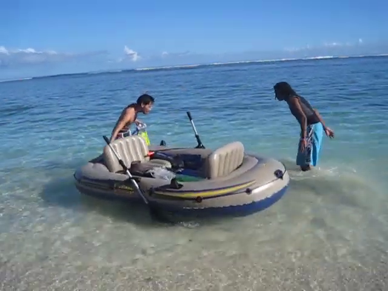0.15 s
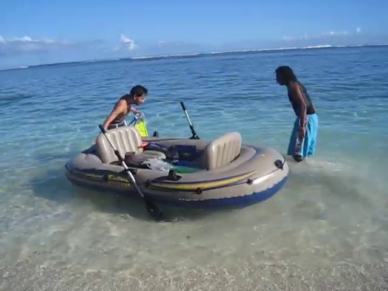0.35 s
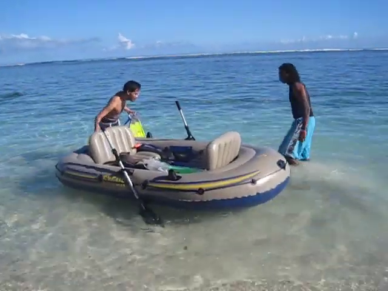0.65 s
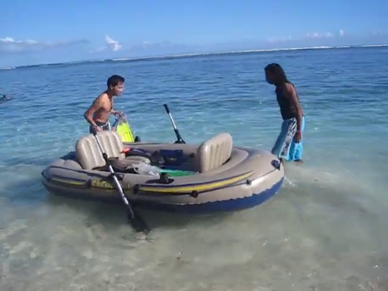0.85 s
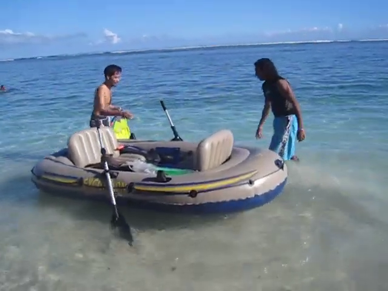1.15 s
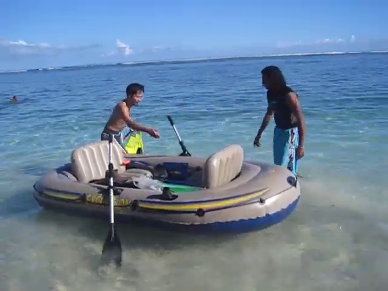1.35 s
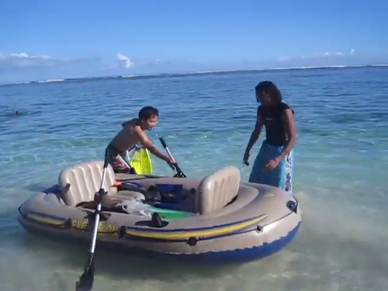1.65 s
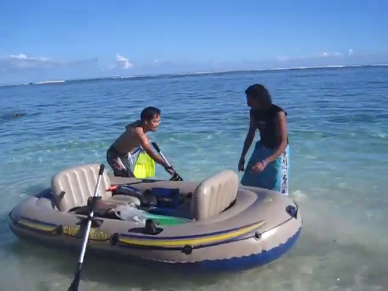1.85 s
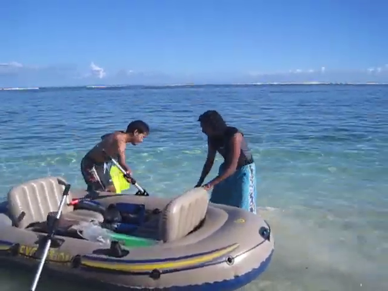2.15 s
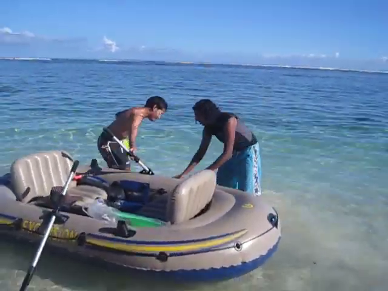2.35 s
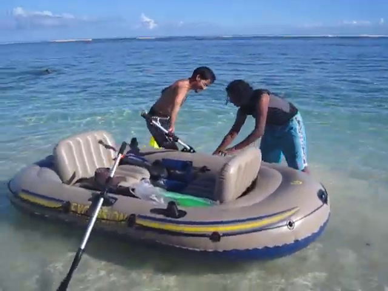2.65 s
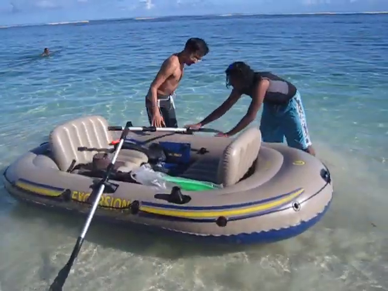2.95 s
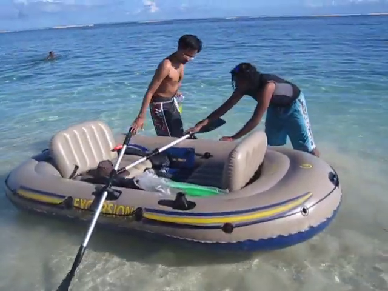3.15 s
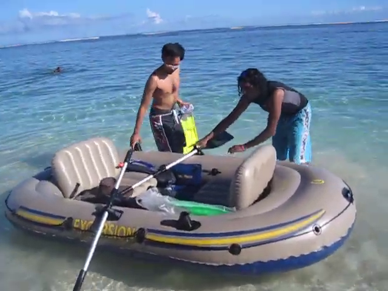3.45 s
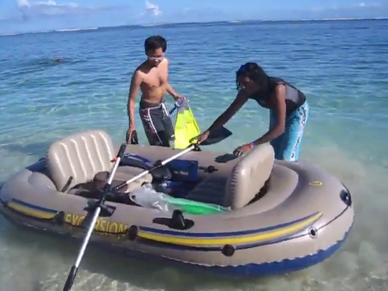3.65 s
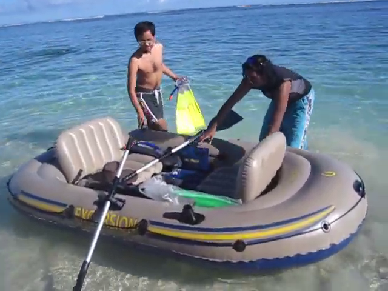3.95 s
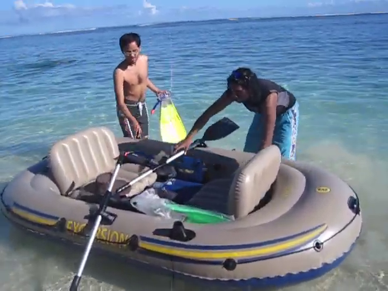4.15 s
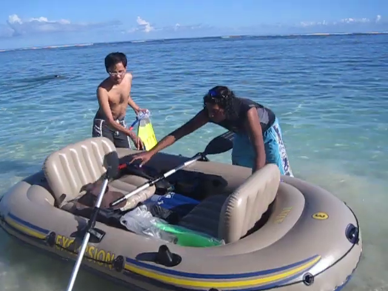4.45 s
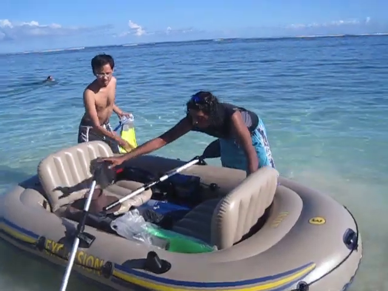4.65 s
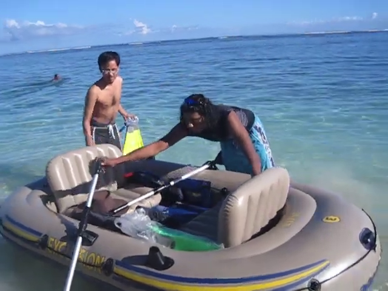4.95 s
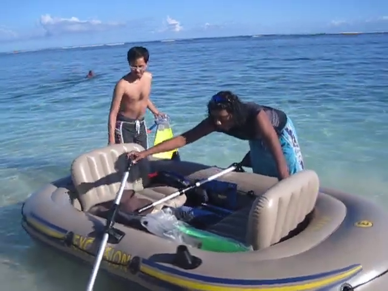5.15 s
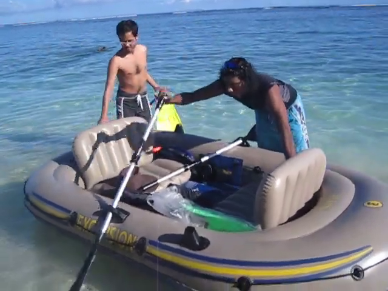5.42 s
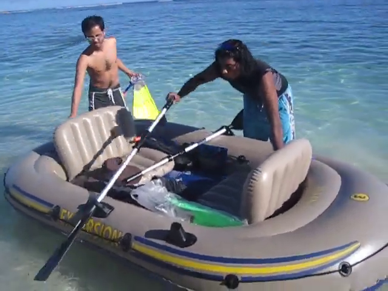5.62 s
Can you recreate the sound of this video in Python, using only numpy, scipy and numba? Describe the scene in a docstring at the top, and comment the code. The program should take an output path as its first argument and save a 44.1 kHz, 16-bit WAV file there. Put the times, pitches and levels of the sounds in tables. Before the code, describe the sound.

Soft shore wash swells and fades, then sharp hard-plastic clacks, ticks and brief rubs crowd close over a faint breeze rumble.

```python
"""Shore wash through a sealed housing

Small waves fizz over shallow sand: noise and bubble grains through the resonances of a plastic camera housing.
Fingers tap, tick and slide on it: rough pushes and stick-slip clicks.
A chirp, a rattle and finger squeaks are narrow noise; drops ring the air pocket inside.
A light breeze, shaped noise, rumbles on the port; the gain control backs off after the loudest knocks.
"""
import sys
import numpy as np
from scipy import signal
from scipy.fft import rfft, irfft, next_fast_len
from scipy.io import wavfile
from scipy.ndimage import uniform_filter1d
from numba import njit

SR = 44100
rng = np.random.default_rng(int(sys.argv[2]) if len(sys.argv) > 2 else 0)


def to_wav(sig):
    """Store sig (one row per channel, or 1-D mono) as 16-bit WAV at the path in sys.argv[1].

    Samples outside -1..1 are clipped; the rate is SR.
    """
    pcm = np.clip(np.atleast_2d(sig), -1, 1) * 32767
    pcm = np.round(pcm).astype(np.int16)
    wavfile.write(sys.argv[1], SR, pcm.T)  # frames by channels


N = 254898

# wave wash: (time [s], fizz level [dB])
WASH = [(0.0, -52.5), (0.56, -51.5), (0.8, -48), (1.32, -49), (1.9, -42), (2.17, -40.5), (2.43, -45),
        (2.62, -53.5), (2.83, -58), (3.93, -59.5), (5.22, -55), (5.78, -49.5)]
# drops on the air pocket: (time [s], peak level [dB])
DROPS = [(1.905, -39), (5.0426, -46), (5.1955, -43), (5.449, -58)]
# housing resonances: (centre [Hz], width [Hz], level [dB])
HOUSING = [(315, 206, -4.5), (1019, 63, -1), (1203, 85, -2.5), (1869, 106, 0.5), (2456, 188, -7),
           (2780, 195, -2), (3478, 133, -1), (4474, 416, -9.5), (5860, 197, -13.5), (6390, 240, -22.5),
           (6990, 280, -20), (8130, 770, -21), (9380, 210, -14.5), (10170, 890, -21), (12500, 2800, -34)]
# contact bands knock, clop, clack, click, tick: (low edge [Hz], high edge [Hz])
BANDS_HZ = [(140, 850), (850, 1450), (1450, 2250), (2250, 6500), (6500, 16000)]
# finger taps: (time [s], click peak [dB], thud minus click [dB], thud pitch [Hz], body minus click [dB],
#               spot [0 knock, 1 clop, 2 clack], tick minus click [dB])
TAPS = [(0.818, -32, -24, 62, -22, 2.1, -27), (1.712, -21.5, -5, 171, 6.5, 2.03, -10.5),
        (1.7311, -17, -21, 73, -17, 1.2, -29), (1.74, -20, -26, 118, -12, 1.4, -12),
        (1.7607, -17.5, -18, 199, -7.5, .3, -4), (1.7682, -19.5, -20, 199, 1, 1.6, -13),
        (1.7746, -8.5, -44, 61, -21, 0.93, -12), (1.792, -26, -37, 199, -21, 1.1, -28),
        (1.797, -22, -40, 62, -23, 1.6, -24), (1.8059, -18, -41, 199, -14, 0.54, -25),
        (1.8155, -17.5, -37, 172, -11.5, 0.29, -15), (1.8424, -22.5, -22, 70, -11, .9, -7),
        (1.934, -36, 1.5, 68, -17, 0.72, -12), (2.1506, -17.5, -20, 81, -2, 2.16, -4.5),
        (2.2298, -14.5, -4.5, 76, 5.5, 1.4, 0.5), (2.2474, -23.5, -3, 62.6, 0, 0.21, 2),
        (2.2609, -15.5, 3.5, 89.5, 8, 1.6, -4), (2.3168, -26.5, -1, 183, 7.5, .9, -5),
        (2.3199, -23, 5.5, 75.6, 4, 0.25, -2), (2.4302, -34.5, 10, 199, 2, 0.47, -9),
        (2.4344, -15, -15, 199, 2, 1.6, -11.5), (2.4367, -7, -10, 63, 1.5, 1.81, -9.5),
        (2.7172, -16.5, -1, 176, 4, 1.3, -6), (2.7214, -3.5, -23, 193, -4, 2, -10.5),
        (2.7403, -12.5, -7, 97, -4, 2.1, -29), (2.7506, -15.5, -29, 62, -2, 1.6, -9),
        (2.8897, -38.5, 3, 130, 6, 0.11, -13), (2.897, -36.5, 3.5, 86, -14, .2, -6),
        (3.0092, -43.5, -6, 73, 5.5, 0.22, -22), (3.0716, -41.5, 14, 98, 15.5, 0.28, -4),
        (3.1472, -22, -5, 104, 6.5, 0.51, -13), (3.2625, -37, -13.5, 135, -8, 1.4, -18),
        (3.4232, -31, -8, 63.6, -1, 1.6, -4), (3.4312, -24.5, 1, 139, 4.5, 2, -14),
        (3.456, -39, -12, 151.4, -9, 1.4, -7), (3.5038, -40, 14, 200, 4, 0.62, -18),
        (3.5261, -46, 13, 136, 5, .6, -15), (3.5566, -29, 6.5, 63, 11, 0.092, -14),
        (3.6189, -19, -8.5, 199, .2, 2.35, -13), (3.6336, -14.5, -15, 159, 4.3, 1.73, -3),
        (3.6392, -5, -18.5, 92, -2.5, 2.23, -11), (3.7063, -31.5, -27, 62, 6.5, 1.3, -15),
        (3.9038, -38, -15, 62, -15, 1.3, -17), (3.922, -39, -20, 83, -22, 1.7, -3),
        (3.94, -38, -9, 129, -8, 1.6, -6), (4.0392, -44.5, -22, 97, -17, .9, -3),
        (4.0969, -35.5, -25, 118, -22, 1.1, 0), (4.1061, -37, -16, 62, -11, 1.6, -4),
        (4.138, -20, -10, 334, 1.5, 2.08, -8.5), (4.1706, -38, -16, 62, -8, .1, -23),
        (4.185, -38.5, -13, 62.9, -9, .1, -14), (4.2363, -38, -19, 140, -14, .1, -0.5),
        (4.3274, -45, -15, 97.3, -13, 0.61, .2), (4.3709, -30.5, -18, 62, -23, 1.8, -3.5),
        (4.42, -16.5, -22, 97, -1, 2.17, -16), (4.4273, -33.5, 2, 62, -6, 1.2, 2),
        (4.5048, -28.5, -15, 62, -17, 1.1, -3), (4.5102, -29, -29, 124, -21, 1.6, 2.5),
        (4.5306, -36, -22, 186, -15, 1.4, 4), (4.5387, -30, -29, 100, -14, 1.3, -4),
        (4.574, -33, -24, 78, -15, 1.7, 1.5), (4.6309, -41, -19, 81, -13, 1.7, -0.5),
        (4.7433, -35, -9, 62, -10, 2.1, 4), (4.7692, -21, -17, 89, 1, 1.78, -13),
        (4.7874, -40, 1, 62, -14, 0.68, 4.5), (4.8674, -37, -23, 199, -4.5, 1.15, 1),
        (4.8764, -37, -26, 129, -10, 2, -2), (4.884, -34, -30, 113, -12, 1.5, 0),
        (4.892, -38, -28, 196, -3, 1.6, -18), (4.9257, -24.5, -33, 62, -4, 1.8, -19),
        (4.9372, -32, -22, 102, -13, 2.1, -7), (5.131, -36.5, -14, 156, -4, .3, -8),
        (5.224, -37, -1, 133, -7, 0.096, -15), (5.2837, -32.5, -24, 62, -4, 2.4, -10),
        (5.489, -43, -19, 94, -11, .1, -25), (5.515, -30, -1.5, 197, -6.5, .1, -27)]
# times in the next two may be out of order; a row is silent if stop precedes start
# skin sliding on plastic: (start [s], turning point of the level [s], stop [s], click band level [dB],
#                           lower bands minus click [dB], tick minus click [dB])
SLIDES = [(1.35, 1.42, 1.51, -45.5, -8, -10), (1.477, 1.53, 1.53, -42, -13, -13),
          (1.726, 1.728, 1.83, -37, -6, -15), (1.787, 1.798, 1.795, -33, -9, -17),
          (2.262, 2.263, 2.31, -37, -1.5, -7), (2.315, 2.303, 2.4, -38, -2, -5.5),
          (2.707, 2.751, 2.796, -28.5, -6, -11), (3.072, 3.078, 3.12, -52.5, 0, -5),
          (3.142, 3.154, 3.18, -40, 0, -6), (3.146, 3.197, 3.29, -40, -4.5, -7.5),
          (3.24, 3.274, 3.29, -50.5, -2, -9), (3.286, 3.33, 3.39, -56, -2.5, -11),
          (3.463, 3.474, 3.55, -51.5, -5, -5.5), (3.553, 3.566, 3.67, -37.5, -2.2, -10.5),
          (3.585, 3.615, 3.635, -40, -3, -9), (3.618, 3.639, 3.7, -35, -3, -9.5),
          (3.698, 3.721, 3.775, -32, -7, -9.5), (3.9, 3.928, 4.04, -53, -7, -18),
          (4.427, 4.43, 4.53, -52.5, -4, -14), (4.49, 4.512, 4.8, -62, 0, -9),
          (4.837, 4.876, 4.88, -44, -7, -2.5), (5.465, 5.51, 5.56, -52, -6, -30),
          (4.902, 4.916, 5.03, -49, -9, -13)]
# narrow rings on the housing, a chirp, a rattle and finger squeaks:
#   (start [s], turning point of the level [s], stop [s], level [dB], pitch [Hz])
NARROW_RINGS = [(0.81, 0.822, 0.83, -43, 3430), (1.722, 1.735, 1.72, -29, 3200),
                (1.781, 1.801, 1.828, -27.5, 2850), (3.287, 3.317, 3.27, -52, 3460),
                (4.736, 4.764, 4.8, -46, 1870), (4.844, 4.878, 5, -46.5, 1890),
                (4.9, 4.938, 4.965, -44, 1870)]
# breeze strength: (time [s], level [dB])
BREEZE = [(0.0, -49), (0.22, -53), (1.51, -55), (1.85, -50), (2.3, -57), (4.64, -53), (5.78, -53.5)]
# breeze spectrum, relative: (frequency [Hz], density [dB per Hz])
BREEZE_COLOUR = [(12, -16), (20, 6.5), (60, -1), (183, -2.5), (248, -8.5), (585, -10.5), (634, -12.5),
                 (900, -16), (1170, -56), (1980, -120)]

# wash: level against the fizz when calm, and change per dB of swell
CALM_DB = -58  # fizz between waves
SPLASH_DB, SPLASH_PER_DB = -1.15, -0.5169  # bands under 2250 Hz
SPRAY_DB, SPRAY_PER_DB = -8, -0.44  # over 6500 Hz
POCKET_DB, POCKET_PER_DB = -7.5, -0.1252
POCKET_HZ, POCKET_WIDTH_HZ = 1005, 45  # air in the housing that the wash keeps ringing
DROP_RISE_S = 0.0026

# contacts
SNAP = 6  # first touch against the rough push after it
GRIP = 1.95  # a touching finger widens every resonance by this factor
SPOT_DB_PER_BAND, SPOT_MAX_DB = 8.5, 12.5  # loss away from the spot that is hit
RISE_MS, CONTACT_MS = 0.35, 1.53  # the push
SCUFF_DB, SCUFF_MS = -19.5, 9.2  # the finger settling
FIDGET_COUNT, FIDGET_START_S, FIDGET_END_S = 10, 3.3, 5.0  # fingers shifting their hold
FIDGET_MIN_DB, FIDGET_RANGE_DB, FIDGET_TICK_DB = -49, 7.0, -1.5
STROKE_END_DB, STROKE_BEND = -27, 2.05  # level at the ends; higher bend holds longer near the turn
RING_WIDTH = 0.043  # share of the pitch

# electronics
HISS_DB = -81
HUMP_DB, HUMP_HZ, HUMP_WIDTH_HZ = -71, 13300, 1500  # preamp hiss near the top
GAIN_KNEE_DB, GAIN_SLOPE, ATTACK_S, RELEASE_S = -23, 0.61, 0.0076, 0.25
TOP_HZ = 15900


def waves():
    """Dense foam hiss and bubbles ring the housing; each band flickers a little by itself."""
    fizz_db = np.interp(np.arange(N) / SR, *np.transpose(WASH))
    swell_db = fizz_db - CALM_DB  # a breaking wave adds mostly middle fizz
    splash_db = SPLASH_DB + SPLASH_PER_DB * swell_db
    spray_db = SPRAY_DB + SPRAY_PER_DB * swell_db
    pocket_db = fizz_db + POCKET_DB + POCKET_PER_DB * swell_db

    bubbles = grains(rate_hz=2500, spread_db=2.0, cycles=0.75, lo_hz=1870, hi_hz=8700)
    foam = rng.standard_normal(N) + 0.18 * bubbles
    tilt_db = [splash_db - 3.0, splash_db - 1.5, splash_db - 0.5, 0, spray_db]
    lap = walk(6.4)  # shared by all bands
    hiss = np.zeros(N)
    for band_db, band in zip(tilt_db, unit(housed(foam, 1.11))):
        hiss += undb(fizz_db + band_db + 0.15 * lap + 0.57 * walk(27)) * band

    # waves break at changing places, so single resonances flare up in turn
    flares = np.zeros(N)
    for hz, width_hz, db in HOUSING[3:9]:
        flares += undb(db + 2.9 * walk(6)) * narrow(hz, width_hz)
    pocket = undb(pocket_db + 0.5 * walk(11)) * narrow(POCKET_HZ, POCKET_WIDTH_HZ)
    return hiss + undb(fizz_db - 13.0) * flares + pocket


def grains(rate_hz, spread_db, cycles, lo_hz, hi_hz):
    """Bursting bubbles: random short rings at six pitches, a few of them much larger."""
    out = np.zeros(N)
    t = np.arange(256) / SR
    for hz in np.geomspace(lo_hz, hi_hz, num=6):
        bursts = rng.random(N) < rate_hz / SR / 6
        pops = bursts * undb(spread_db * rng.exponential(size=N))
        ring = np.sqrt(hz) * np.sin(2 * np.pi * hz * t) * np.exp(-t * hz / cycles)
        out += signal.fftconvolve(pops, ring)[:N]
    return unit(out)


def drops():
    """Each drop rings the air pocket, swelling and dying within a few tens of cycles."""
    out, t = np.zeros(N + 4096), np.arange(4096) / SR
    envelope = t / DROP_RISE_S * np.exp(1 - t / DROP_RISE_S)
    for s, db in DROPS:
        out[int(s * SR):][:4096] += undb(db) * envelope * np.sin(2 * np.pi * POCKET_HZ * t)
    return out[:N]


def taps():
    """Each contact is a short rough push that rings the housing and thumps the diaphragm."""
    out, t = np.zeros(N + 4096), np.arange(4096) / SR
    push = np.exp(-t * 1000 / CONTACT_MS) + undb(SCUFF_DB) * np.exp(-t * 1000 / SCUFF_MS)
    push[1:] *= 1 - np.exp(-t[1:] * 1000 / RISE_MS)  # sample 0 stays a sharp step
    for s, click_db, thud_db, thud_hz, body_db, spot, tick_db in [*TAPS, *fidgets()]:
        grit = rng.standard_normal(4096)
        grit[0] = SNAP
        rung = housed(grit * push, GRIP)
        rung /= np.abs(signal.hilbert(rung)).max(axis=1, keepdims=True)
        spot_loss_db = np.minimum(SPOT_DB_PER_BAND * np.abs(np.arange(3) - spot), SPOT_MAX_DB)
        knock = undb([*(body_db - spot_loss_db), 0, tick_db]) @ rung
        thump = np.sin(2 * np.pi * thud_hz * t) * np.exp(-t * thud_hz / 0.58)
        out[int(s * SR):][:4096] += undb(click_db) * (knock - undb(thud_db) * thump)
    return out[:N]


def fidgets():
    """Faint ticks at chance moments as the fingers shift their hold; rows as in TAPS."""
    rows = []
    for when, level, spot in rng.random((FIDGET_COUNT, 3)):
        s = FIDGET_START_S + (FIDGET_END_S - FIDGET_START_S) * when
        click_db = FIDGET_MIN_DB + FIDGET_RANGE_DB * level
        rows.append((s, click_db, -15, 80, -11, 2 * spot, FIDGET_TICK_DB))
    return rows


def slides():
    """Stick-slip: dense uneven clicks into the housing while a finger moves."""
    slips = rng.standard_normal(N) * undb(2.5 * walk(400) + 0.8 * walk(70))
    slips = signal.lfilter([1, -0.7], 1, slips)  # short slips are bright
    bands, out = unit(housed(slips, 1.12)), np.zeros(N)
    for start_s, turn_s, stop_s, db, low_db, tick_db in SLIDES:
        at, shape_db = stroke(start_s, turn_s, stop_s)
        mix = undb([low_db - 2.5, low_db + 0.3, low_db, 0, tick_db])
        out[at] += undb(db + shape_db) * (mix @ bands[:, at])
    return out


def narrow_rings():
    """Noise on a single resonance, shaped as a stroke."""
    out = np.zeros(N)
    for start_s, turn_s, stop_s, db, hz in NARROW_RINGS:
        at, shape_db = stroke(start_s, turn_s, stop_s)
        out[at] += undb(db + shape_db) * narrow(hz, hz * RING_WIDTH)[at]
    return out


def stroke(start_s, turn_s, stop_s):
    """Sample indices and level in dB, interpolated from the ends to 0 at the turning point."""
    at = np.arange(int(start_s * SR), int(stop_s * SR))
    distance = np.interp(at / SR, [start_s, turn_s, stop_s], [1, 0, 1])
    return at, STROKE_END_DB * distance ** STROKE_BEND


def breeze():
    """Low rumble of air across the port, uneven in strength."""
    s, db = np.transpose(BREEZE)
    hz, colour_db = np.transpose(BREEZE_COLOUR)
    size = next_fast_len(N, real=True)
    bins_hz = np.fft.rfftfreq(size, 1 / SR) + 1  # +1 keeps the log finite
    colour = undb(np.interp(np.log(bins_hz), np.log(hz), colour_db))
    air = irfft(rfft(rng.standard_normal(size)) * colour, size)[:N]
    return unit(air) * undb(np.interp(np.arange(N) / SR, s, db) + 1.3 * walk(14))


def housed(x, damping):
    """Parallel housing resonances of alternating sign, widened by damping; one row per band."""
    size = next_fast_len(len(x), real=True)
    hz = np.fft.rfftfreq(size, 1 / SR) + 1e-9
    ring = 0
    for k, (centre_hz, width_hz, db) in enumerate(HOUSING):
        detune = (hz ** 2 - centre_hz ** 2) / (hz * width_hz * damping)
        ring = ring + (-1) ** k * undb(db) / (1 + 1j * detune)
    splits = []
    for band_hz in BANDS_HZ:
        b, a = signal.butter(3, band_hz, "band", analog=True)
        splits.append(signal.freqs(b, a, hz)[1])
    return irfft(rfft(x, size) * ring * np.array(splits), size)[:, :len(x)]


def narrow(centre_hz, width_hz):
    """Noise caught in one narrow ring, rms 1."""
    edges_hz = [centre_hz - width_hz / 2, centre_hz + width_hz / 2]
    ring = signal.butter(1, edges_hz, "band", fs=SR, output="sos")
    return unit(signal.sosfilt(ring, rng.standard_normal(N)))


def walk(rate_hz):
    """Random levels held 1 / rate_hz s and slewed twice; spread near 1."""
    k = int(SR / rate_hz)
    steps = np.repeat(rng.standard_normal(N // k + 1), k)
    return 1.46 * uniform_filter1d(uniform_filter1d(steps, k), k)[:N]


def undb(db):
    """Gain of a level in dB."""
    return 10 ** (np.asarray(db) / 20)


def unit(x):
    """Scaled to rms 1 along the last axis."""
    return x / np.sqrt(np.mean(x ** 2, axis=-1, keepdims=True))


@njit
def follow(x, attack, release):
    """Level that rises quickly and falls slowly; attack and release are shares per sample."""
    level, out = 0., np.empty(len(x))
    for i in range(len(x)):
        size = abs(x[i])
        level += (size - level) * (attack if size > level else release)
        out[i] = level
    return out


def scene():
    """Water, hands and air, all at one port."""
    return (waves() + drops() + taps() + slides() + narrow_rings() + breeze())[None]


def record(dry):
    """Gain control backs off after loud knocks; preamp hiss; steep low-pass."""
    loud = follow(dry[0], 1 / (ATTACK_S * SR), 1 / (RELEASE_S * SR))
    gain = np.minimum(1, (undb(GAIN_KNEE_DB) / (loud + 1e-9)) ** GAIN_SLOPE)
    hiss = undb(HISS_DB) * rng.standard_normal(N)
    hump = undb(HUMP_DB) * narrow(HUMP_HZ, HUMP_WIDTH_HZ)
    wet = gain * (dry + hiss + hump)
    return signal.sosfilt(signal.ellip(10, 0.2, 80, TOP_HZ, fs=SR, output="sos"), wet)


dry = scene()
out = record(dry)
to_wav(out)
```